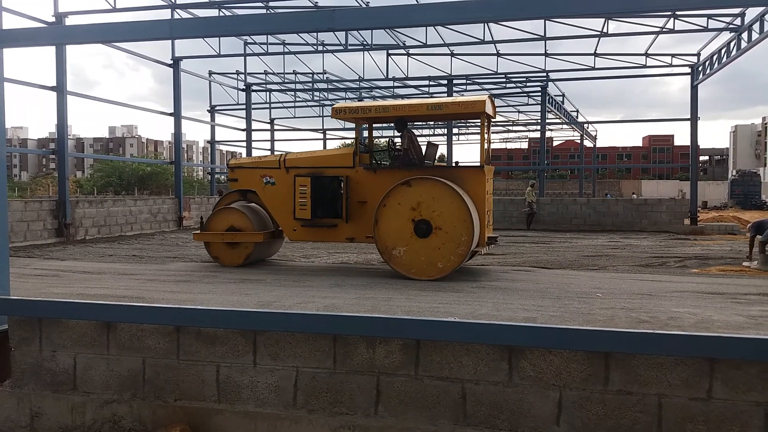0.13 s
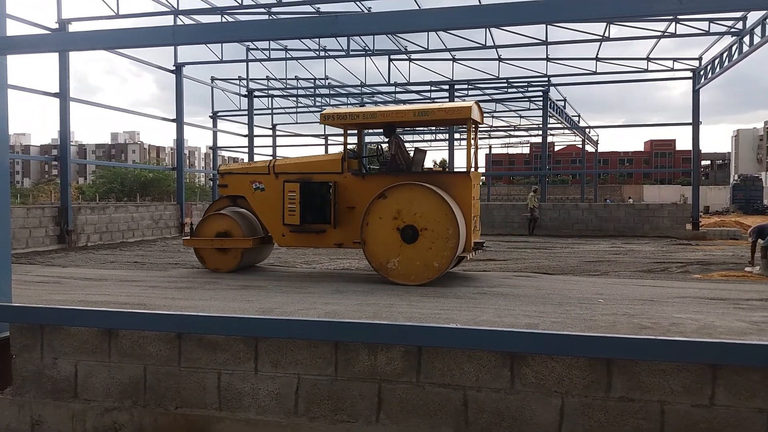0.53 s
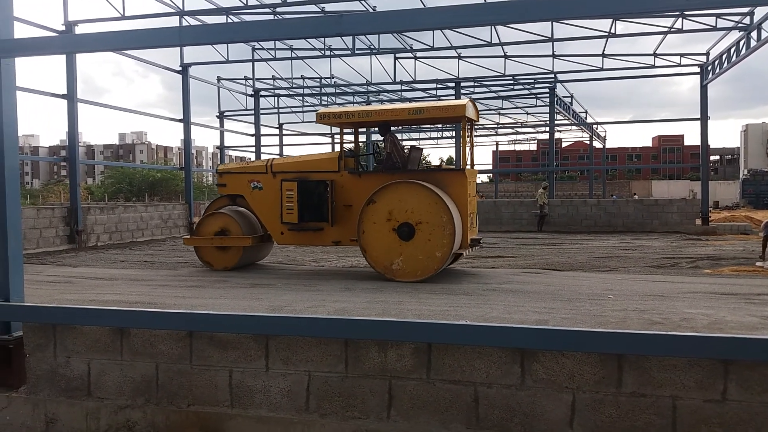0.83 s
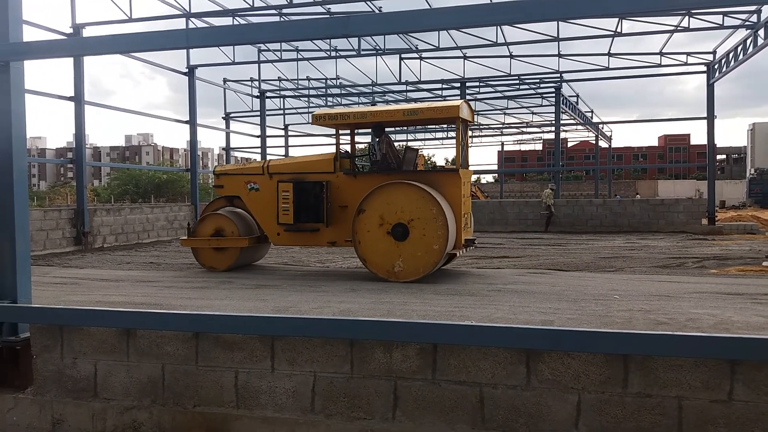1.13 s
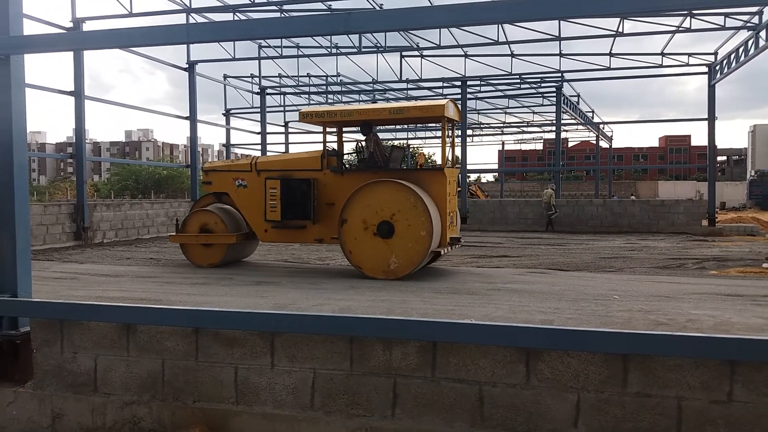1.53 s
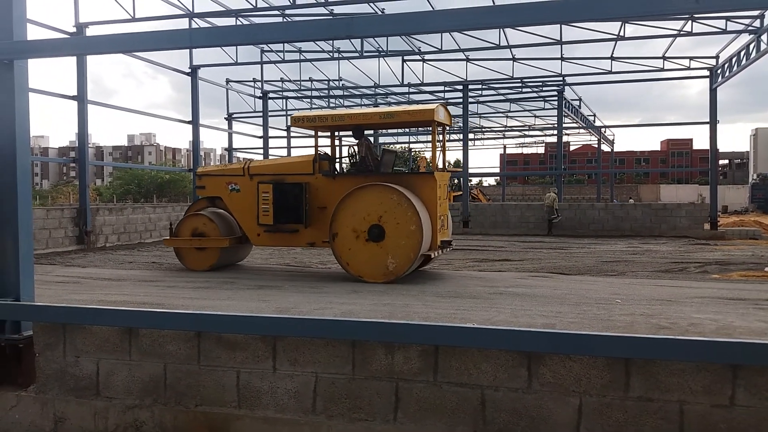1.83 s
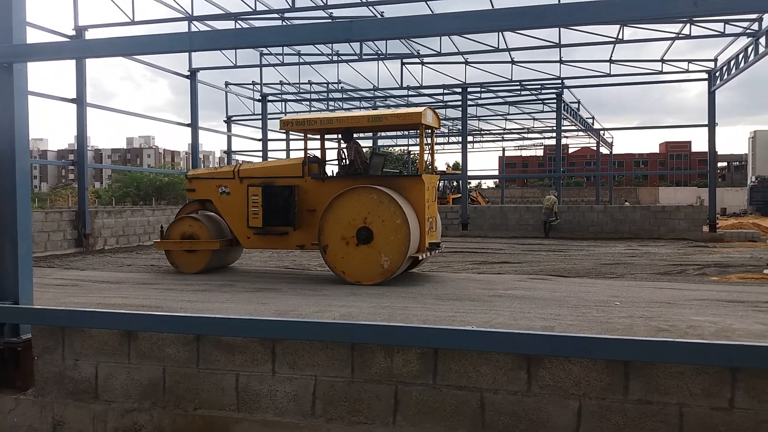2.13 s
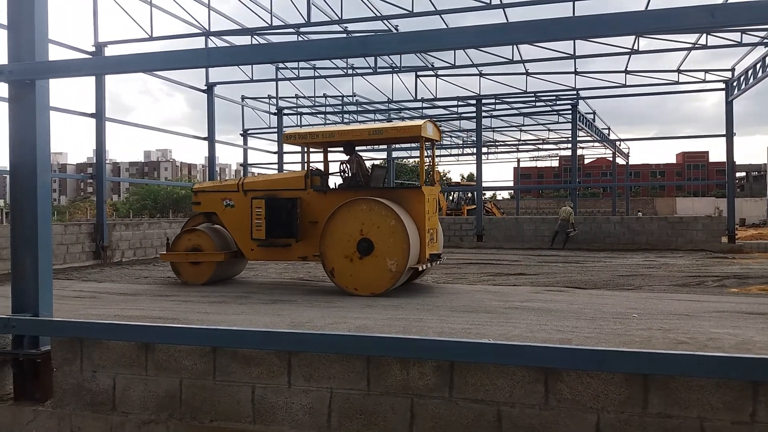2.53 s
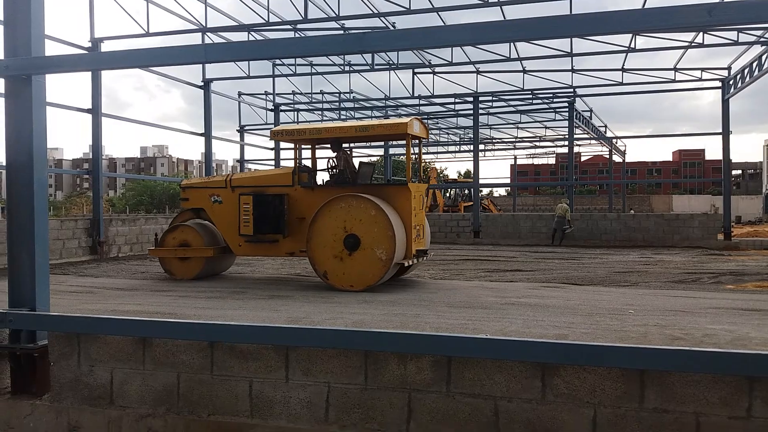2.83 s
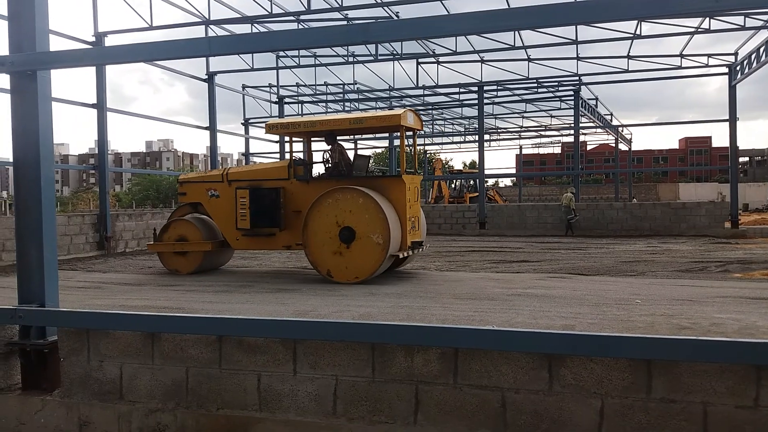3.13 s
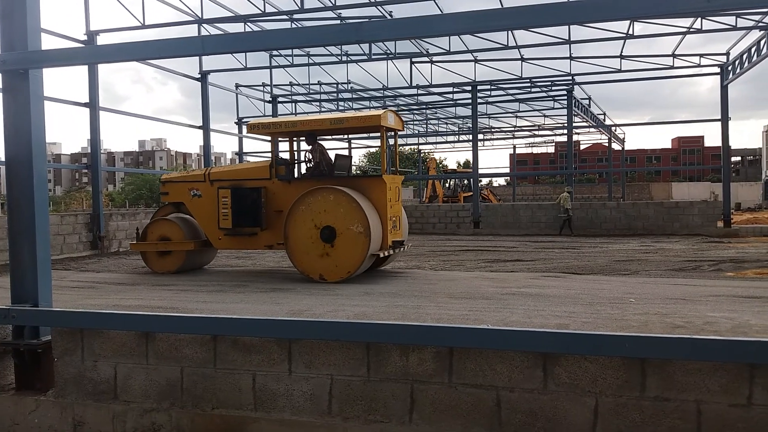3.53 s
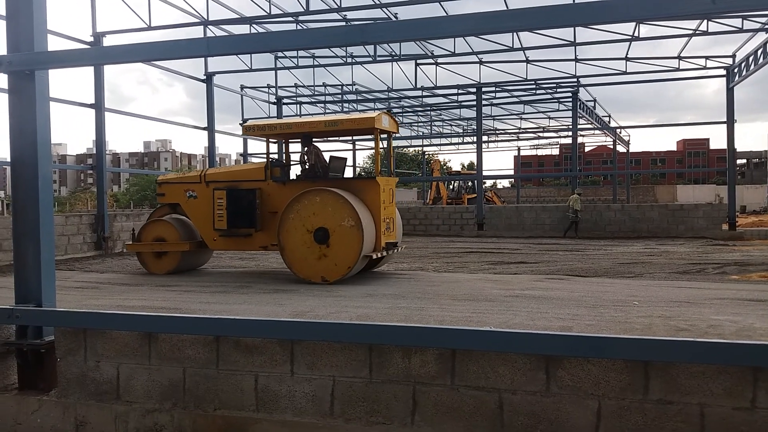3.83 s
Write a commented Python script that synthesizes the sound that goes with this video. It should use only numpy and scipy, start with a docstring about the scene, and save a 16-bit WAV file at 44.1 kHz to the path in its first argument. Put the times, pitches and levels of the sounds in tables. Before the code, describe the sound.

Slow four-cylinder diesel of a road roller, heard outdoors in mono: fast double ticks and ringing knocks over a wavering low drone and rumble, with clatter fading as it turns side-on and leaves, and occasional soft thuds.

```python
"""Road roller creeping past

It passes under an open steel frame, turns side-on and leaves, driven by a slow four-cylinder diesel.
The low bed is filtered-noise drum rumble and body boom, sine thuds for bumps and a crank-locked drone.
Nearer the ear, noise clatter fades as the machine turns side-on. Every firing snaps a double tick of
shaped noise, then a double knock of decaying sines that rings the engine's metal."""
import sys
import numpy as np
from scipy import signal
from scipy.fft import rfft, irfft
from scipy.io import wavfile
from scipy.ndimage import uniform_filter1d

SR = 44100
rng = np.random.default_rng(int(sys.argv[2]) if len(sys.argv) > 2 else 0)


def dump(signal):
    """Clip the signal to [-1, 1] and save it as 16-bit WAV at the path in sys.argv[1]."""
    limited = np.clip(np.atleast_2d(signal).T, -1, 1)
    pcm = np.round(limited * 32767).astype(np.int16)
    wavfile.write(sys.argv[1], SR, pcm)


N = 175518
TIME = np.arange(N) / SR

# Spectra below set shape only: colour() brings each to unit rms before its level curve.

# firing times; a short cut in the sound just after 2 s brings later firings early:
# firings_counted, time_s
CRANK = [(-2, -.025), (0, .0335), (4, .1503), (12, .3845), (20, .616), (32, .9656), (44, 1.3143),
         (56, 1.6653), (64, 1.8995), (68, 2.0175), (69, 2.0235), (73, 2.1412), (77, 2.2595), (85, 2.4952),
         (101, 2.9627), (113, 3.312), (125, 3.6594), (137, 4.009)]
TOP_FIRING_HZ = 34.6  # ceiling on the drone's firing rate, so that its pitch does not jump at the cut
# cylinders in firing order: tick_db, second_tick_after_s, second_tick_db (re first),
# knock_db, second_knock_after_s, second_knock_db (re first)
CYLINDERS = [(4, 0.00557, -4, -3.5, .009, -19), (3.5, 0.0074, -3.5, 1.5, .008, -6),
             (3.5, 0.0084, -5, -0.5, 0.0082, -6), (3.5, 0.0052, -6, -10, 0.0076, 1.5)]

# rumble of the drums, then boom of the body: frequency_hz, density_db_per_hz
RUMBLE_SPECTRUM = [(10, -23), (30, -29), (40, -16.5), (50, -4), (65, -1), (92, 1), (115, 3.5), (150, -2.5),
                   (180, -3), (215, -16.5), (300, -31), (600, -69)]
BOOM_SPECTRUM = [(100, -41.5), (170, -6.5), (210, -3.5), (265, 0.5), (305, 1.5), (345, -4), (400, -8),
                 (460, -11.5), (540, -28), (900, -49)]
# their levels before the trims: time_s, level_db
RUMBLE_LEVEL = [(0, -40.5), (.28, -37.5), (.48, -41), (.62, -34.5), (0.799, -46), (.92, -41), (1.03, -38),
                (1.25, -40), (1.6, -39), (1.95, -45), (2.25, -42), (2.5, -40.5), (2.85, -42.5), (3.1, -40),
                (3.4, -46.5), (3.6, -37.5), (3.69, -41.5), (3.98, -39.5)]
BOOM_LEVEL = [(0.0, -37), (0.21, -36), (0.23, -41), (0.74, -39), (0.78, -34.5), (0.8, -41), (2.21, -48),
              (2.75, -43.5), (2.94, -48.5), (3.09, -43.5), (3.14, -52.5), (3.27, -40), (3.35, -47.5),
              (3.98, -46.5)]
RUMBLE_TRIM_DB, BOOM_TRIM_DB = 1, 0.5
PUFF_DEPTH, CHUG_DEPTH = 0.18, 0.076  # fractions of amplitude
# bumps of the drums: start_s, envelope_peak_db (before the low cut), pitch_hz
BUMPS = [(.263, -29, 111), (0.756, -32, 131), (0.999, -24.5, 131), (2.467, -27.5, 170), (2.527, -26, 123),
         (3.085, -24, 96), (3.623, -26.5, 174)]
BUMP_RISE_S, BUMP_LOW_CUT_HZ = 0.0055, 60

# exhaust drone: time_s, second_multiple_db, fourth_multiple_db (multiples of the firing rate)
DRONE_LEVEL = [(0, -41, -40), (.5, -49, -42), (.8, -42.5, -43.5), (1.3, -45, -39), (1.8, -47, -49.5),
               (2.3, -47, -46.5), (2.7, -39.5, -42.5), (3.1, -36, -37), (3.28, -43, -36.5),
               (3.4, -53, -44.5), (3.53, -39, -39.5), (3.7, -50, -45.5), (3.82, -47, -40),
               (3.98, -37.5, -40.5)]
# weaker engine and gear tones: multiple_of_firing_rate, level_db (before the shared curve)
TONES = [(1.5, -60.5), (2.5, -46.5), (2.75, -49), (4.5, -50), (6, -57.5), (7.75, -59), (8.75, -62),
         (9, -56), (11.6, -56.5)]
# shared curve of the weaker tones: time_s, gain_db
TONES_GAIN = [(0, -0.5), (1.3, 1.5), (1.9, -3.5), (2.7, -3), (3.98, -3.5)]
WAVER_DB, WAVER_TURNS = 3, 0.066  # rms wander of level and of phase

# gear and chassis clatter on approach, then side-on and after: frequency_hz, density_db_per_hz
CLATTER_NEAR = [(350, -32), (480, -10.5), (570, -6), (720, 3), (880, 1.5), (1020, -1.5), (1170, -6.5),
                (1550, -1), (1900, -4.5), (2200, -7), (2480, -11), (2750, -15), (3600, -18), (4800, -20.5),
                (5300, -23), (8300, -25), (12500, -43), (15700, -24)]
CLATTER_SIDE = [(350, -27), (480, -5), (570, -9), (700, -0.5), (880, 2), (1020, -2.5), (1170, -7),
                (1550, -4.5), (1900, -7.5), (2200, -13), (2480, -14), (2750, -21), (3600, -24.5),
                (4800, -24.5), (5300, -32), (8300, -23.5), (12500, -28.5), (15700, -28)]
# level of the clatter: time_s, level_db
CLATTER_LEVEL = [(0, -34.5), (.1, -37.5), (.25, -42.5), (.6, -45), (1.0, -46.5), (1.4, -49), (1.8, -51),
                 (2.5, -52), (3.2, -50.5), (3.98, -50.5)]
CLATTER_FLUTTER_DB, CLATTER_SWING_DB = 1.5, 0.2  # random rms, peak of the regular swing

# what the knock rings: pitch_hz, relative_level_db, t60_s
KNOCK_MODES = [(1286, -13.5, 0.045), (1389.5, 2.5, 0.052), (1482, -10.5, 0.069), (1583, -3, 0.059),
               (1660, -15, 0.03), (1802, -4.5, 0.055), (2090, -18, 0.03), (2200, -22, 0.022)]
# level of all knocks together: time_s, level_db
KNOCK_LEVEL = [(0, -39.5), (.35, -47), (.9, -53), (1.4, -53), (1.75, -57.5), (2.4, -55), (3.3, -53.5),
               (3.98, -57)]
# knocks of their own strength, mostly the hardest: time_s, level_re_usual_db
HARD_KNOCKS = [(.193, 0.5), (.309, 2), (.339, 7), (.455, 4.5), (.542, 2.5), (.571, 5), (.687, 1),
               (.777, 5.5), (.803, 5.5), (.893, 4.5), (.923, 9), (1.009, 4.5), (1.242, 3), (1.475, 3.5),
               (1.826, 7), (1.943, 4.5), (2.037, 1), (2.154, 5), (2.39, 3), (2.508, 4), (2.858, 5.5),
               (3.209, -0.5), (3.238, 3), (3.325, 4), (3.672, 3), (3.905, 6.5)]
KNOCK_AFTER_S, KNOCK_CONTACT_S, HARD_WITHIN_S = 0.0125, 0.002, 0.012
KNOCK_SPREAD_DB, KNOCK_PHASE_SPREAD_RAD = 1.5, 0.52

# colour of the ticks approaching, side-on and leaving: frequency_hz, density_db_per_hz
TICK_NEAR = [(1500, -5), (2400, -2), (2800, -5), (3300, -4), (4300, -3), (4900, -7.5), (5250, -17),
             (5800, -4), (6800, -3), (8000, 3), (9500, 1), (10500, 1), (10850, 4.5), (11800, 1.5),
             (13300, -5), (14700, 2), (15700, -4)]
TICK_SIDE = [(1500, -5), (2400, -16), (3000, -10.5), (4200, -3.5), (4800, -9), (5250, -16), (6000, -7.5),
             (7400, -2.5), (8450, 6.5), (9200, -4.5), (10200, -3.5), (10850, 3.5), (11700, -1.5),
             (12400, -7), (13300, -9), (14700, 5.5), (15700, -5)]
TICK_AWAY = [(1500, -3), (2400, -10), (3000, -10), (4200, -3), (4800, -5.5), (5250, -17), (6000, -6.5),
             (7400, -2), (8000, 5.5), (8400, 7), (8750, 5.5), (9200, 1), (10200, -7), (10850, 0.5),
             (11700, -1.5), (12400, -4), (13300, -4), (14700, 1), (15700, 1)]
SIDE_S, AWAY_S = 1.72, 3
# thin metal parts that ring on after each tick: pitch_hz, width_hz, relative_level_db
TICK_MODES = [(2410, 56, 7.5), (2880, 25, -6), (3190, 97, -1.5), (4715, 45, 5), (6970, 26, -5),
              (10670, 67, -5)]
# level of the ticks before the trim: time_s, level_db
TICK_LEVEL = [(0, -41.5), (.1, -43.5), (.22, -46.5), (.36, -47.5), (.55, -50.5), (.8, -50.5), (1.05, -53),
              (1.35, -52.5), (1.62, -51.5), (1.78, -57.5), (2.15, -56.5), (2.35, -60), (2.58, -59),
              (2.75, -57), (3.0, -56), (3.4, -56), (3.7, -57), (3.98, -61.5)]
TICK_TRIM_DB = 2.5
TICK_RISE_S, TICK_HOLD_S, TICK_FALL_S = 0.0012, 0.0011, 0.0019  # the fall is an amplitude decay
TICK_TAIL_POWER_DECAY_S, TICK_TAIL_DB = 0.0051, -7.5
TICK_SPREAD_DB, TICK_JITTER_S, REBOUND_JITTER_S = 1.3, 0.00034, 0.00054

RECORDER_EDGE_HZ = 15900


def amp(db):
    """Decibels to gain."""
    return 10 ** (np.asarray(db) / 20)


def evened(x):
    """Scales to unit rms."""
    return x / np.sqrt(np.mean(x ** 2) + 1e-20)


def level(points, axis=1):
    """Gain over time from one dB column of a curve."""
    rows = np.array(points)
    return amp(np.interp(TIME, rows[:, 0], rows[:, axis]))


def colour(x, points):
    """Filters by a spectrum with a causal, minimum-phase response; unit rms."""
    hz, db = np.transpose(points)
    size = 8192
    bins_hz = abs(np.fft.fftfreq(size, 1 / SR))
    log_gain = np.log(amp(np.interp(np.log(bins_hz + 1), np.log(hz), db)))
    # the Hilbert transform of the log gain gives the minimum phase
    response = np.fft.ifft(np.exp(np.conj(signal.hilbert(log_gain)))).real[:size // 2]
    # a mirrored lead-in lets the filter settle before the start
    padded = np.r_[x[:size][::-1], x]
    return evened(signal.fftconvolve(padded, response)[size:size + N])


def drift(hz):
    """Slow random motion up to a rate; unit rms."""
    low_pass = np.exp(-(np.fft.rfftfreq(N, 1 / SR) / hz) ** 2)
    return evened(irfft(rfft(rng.standard_normal(N)) * low_pass, N))


def add(mix, s, sound):
    """Mixes a sound in at a time, cut at both ends of the mix."""
    at = round(s * SR)
    sound = sound[max(-at, 0):]
    part = mix[max(at, 0):][:len(sound)]
    part += sound[:len(part)]


def crank():
    """Firings counted so far, at every sample."""
    count, s = np.transpose(CRANK)
    return np.interp(TIME, s, count)


def firings():
    """Time and cylinder row of every firing."""
    count, s = np.transpose(CRANK)
    numbers = range(int(count[0]), int(count[-1]))
    return [(np.interp(k, count, s), CYLINDERS[k % len(CYLINDERS)]) for k in numbers]


def rolling(spectrum, curve):
    """Low noise that puffs with every firing and chugs with every engine cycle."""
    angle = 2 * np.pi * crank()
    puffs = 1 + PUFF_DEPTH * np.cos(angle)
    rumble = colour(puffs * rng.standard_normal(N), spectrum)
    # even out slow random swells, so that the curve alone sets the level
    running_rms = np.sqrt(uniform_filter1d(rumble ** 2, size=7000) + 1e-9)
    chug = 1 - CHUG_DEPTH * np.cos(angle / len(CYLINDERS))
    return level(curve) * chug * rumble / running_rms


def bumps():
    """Dull thuds, short decaying sines, as the steel drums ride over the uneven ground."""
    t, out = np.arange(SR // 8) / SR, np.zeros(N)
    for s, db, hz in BUMPS:
        u = t / BUMP_RISE_S
        envelope = u * np.exp(1 - u)  # peaks at 1 after the rise
        add(out, s, amp(db) * envelope * np.sin(2 * np.pi * hz * t))
    low_cut = signal.butter(2, BUMP_LOW_CUT_HZ, "high", fs=SR, output="sos")
    return signal.sosfilt(low_cut, out)


def drone():
    """Wavering exhaust and gear tones, sines at multiples of the firing rate."""
    turns = np.cumsum(np.minimum(np.gradient(crank()), TOP_FIRING_HZ / SR))
    tones = [(2, level(DRONE_LEVEL, axis=1)), (4, level(DRONE_LEVEL, axis=2))]
    tones += [(multiple, amp(db) * level(TONES_GAIN)) for multiple, db in TONES]
    out = np.zeros(N)
    for multiple, gain in tones:
        waver = amp(WAVER_DB * drift(7.3))
        phase_turns = multiple * turns + rng.random() + WAVER_TURNS * drift(5.9)
        out += gain * waver * np.sqrt(2) * np.sin(2 * np.pi * phase_turns)
    return out


def clatter():
    """Dense noise rattle of gears and chassis, swelling once per engine cycle, dulling up to side-on."""
    cycle_angle = 2 * np.pi * crank() / len(CYLINDERS)
    swing = amp(CLATTER_FLUTTER_DB * drift(106) - CLATTER_SWING_DB * np.cos(cycle_angle))
    rattle = swing * rng.standard_normal(N)
    past = np.minimum(TIME / SIDE_S, 1)
    turning = (1 - past) * colour(rattle, CLATTER_NEAR) + past * colour(rattle, CLATTER_SIDE)
    return level(CLATTER_LEVEL) * turning


def knocks():
    """A double blow per firing rings the engine's metal as decaying modes; one cylinder knocks hardest."""
    t, out = np.arange(SR // 8) / SR, np.zeros(N)
    rings = np.array([amp(db - 60 * t / t60) * np.exp(2j * np.pi * hz * t)
                      for hz, db, t60 in KNOCK_MODES])
    rings *= 1 - np.exp(-t / KNOCK_CONTACT_S)  # soft contact
    for s, (*_, db, gap, second_db) in firings():
        knock_s = s + KNOCK_AFTER_S
        extra_db = sum(extra for at, extra in HARD_KNOCKS if abs(knock_s - at) < HARD_WITHIN_S)
        force = amp(db + extra_db)
        spread, rough, second_phase = rng.standard_normal((3, len(rings)))
        blow = amp(KNOCK_SPREAD_DB * spread) * np.exp(1j * KNOCK_PHASE_SPREAD_RAD * rough)
        second_blow = amp(second_db) * np.exp(1j * np.pi * second_phase)
        add(out, knock_s, force * (blow @ rings).imag)
        add(out, knock_s + gap, force * (second_blow @ rings).imag)
    return level(KNOCK_LEVEL) * evened(out)


def ticks():
    """Two gritty noise snaps per firing ring thin metal; their colour turns with the machine."""
    t, power = np.arange(SR // 20) / SR, np.zeros(N)
    # envelopes are summed as power, then applied to one noise
    snap = np.exp(-np.maximum(t - TICK_HOLD_S, 0) / TICK_FALL_S) ** 2
    snap += amp(TICK_TAIL_DB) ** 2 * np.exp(-t / TICK_TAIL_POWER_DECAY_S)
    snap *= np.minimum(t / TICK_RISE_S, 1) ** 2
    for s, (db, gap, second_db, *_) in firings():
        late, spread, second_late, second_spread = rng.standard_normal(4)
        first_gain = amp(db + TICK_SPREAD_DB * spread)
        second_gain = amp(db + second_db + TICK_SPREAD_DB * second_spread)
        add(power, s + TICK_JITTER_S * late, snap * first_gain ** 2)
        add(power, s + gap + REBOUND_JITTER_S * second_late, snap * second_gain ** 2)
    grit = np.sqrt(power) * rng.standard_normal(N)
    ringing = sum(amp(db) * signal.lfilter(*signal.iirpeak(hz, hz / width, SR), grit)
                  for hz, width, db in TICK_MODES)
    metal = grit + ringing
    # crossfade of the three colours: near until 1 s, then side-on, then away
    shares = [np.interp(TIME, [1, SIDE_S, AWAY_S], row) for row in np.eye(3)]
    colours = (TICK_NEAR, TICK_SIDE, TICK_AWAY)
    sound = sum(share * colour(metal, tone) for share, tone in zip(shares, colours))
    return amp(TICK_TRIM_DB) * level(TICK_LEVEL) * evened(sound)


def scene():
    """The engine above the rumble of the moving machine, in mono."""
    rumble = amp(RUMBLE_TRIM_DB) * rolling(RUMBLE_SPECTRUM, RUMBLE_LEVEL)
    boom = amp(BOOM_TRIM_DB) * rolling(BOOM_SPECTRUM, BOOM_LEVEL)
    return (rumble + boom + bumps() + drone() + clatter() + knocks() + ticks())[None]


def record(dry):
    """The recorder's band limit, a steep low-pass."""
    low_pass = signal.firwin(511, RECORDER_EDGE_HZ, window=("kaiser", 9), fs=SR)
    return signal.oaconvolve(dry, low_pass[None], "same")


dry = scene()
out = record(dry)
dump(out)
```